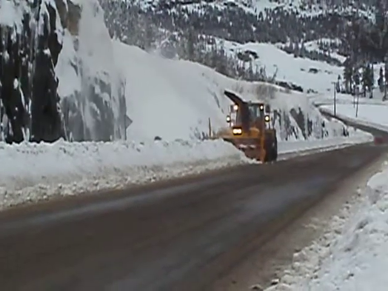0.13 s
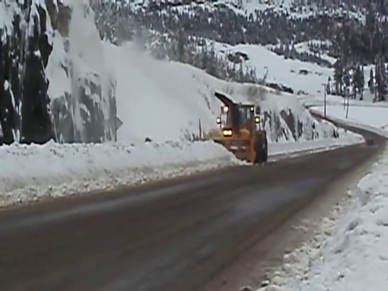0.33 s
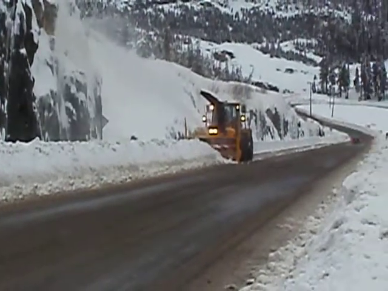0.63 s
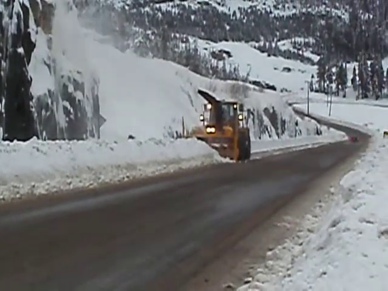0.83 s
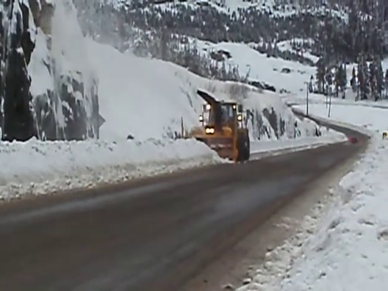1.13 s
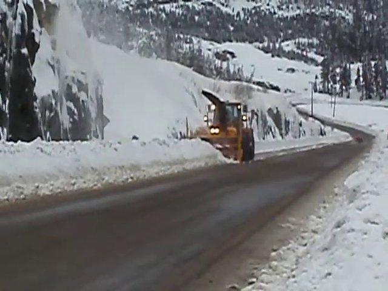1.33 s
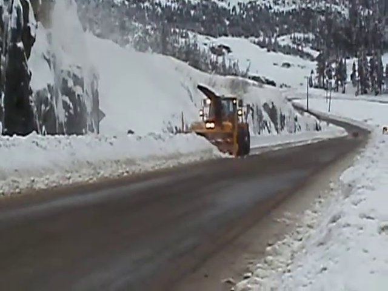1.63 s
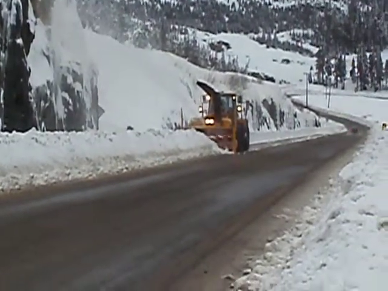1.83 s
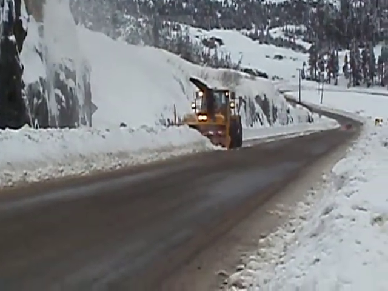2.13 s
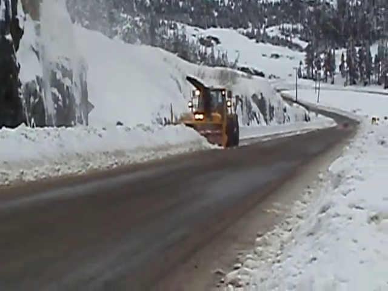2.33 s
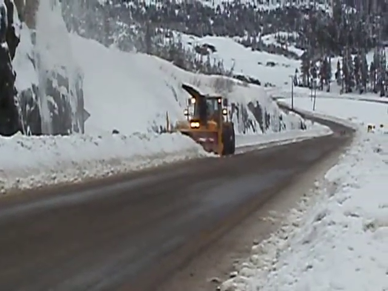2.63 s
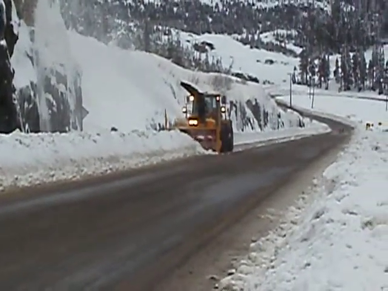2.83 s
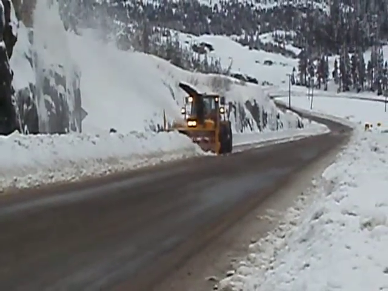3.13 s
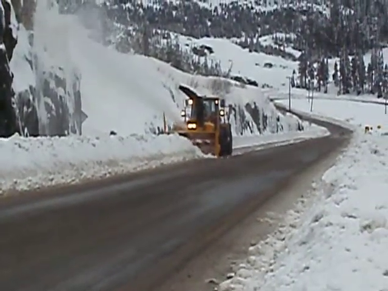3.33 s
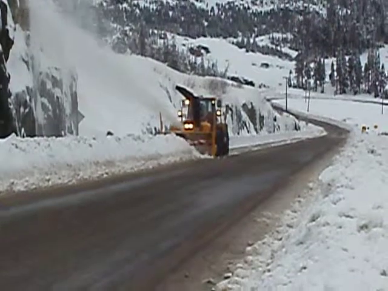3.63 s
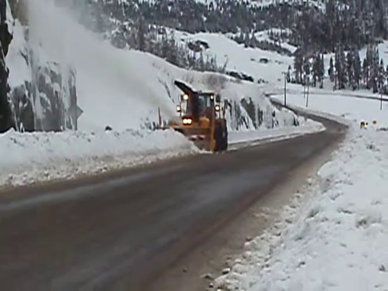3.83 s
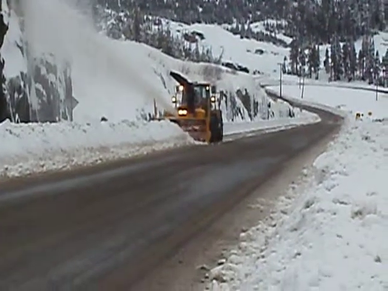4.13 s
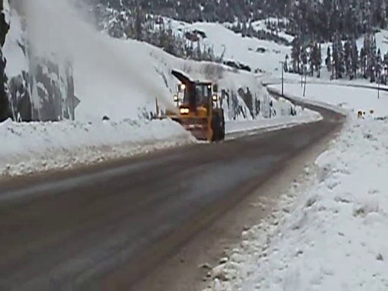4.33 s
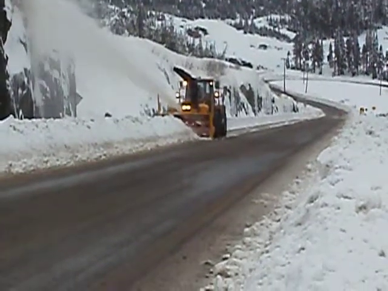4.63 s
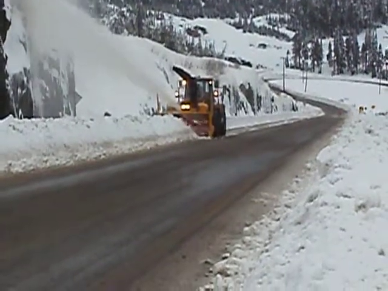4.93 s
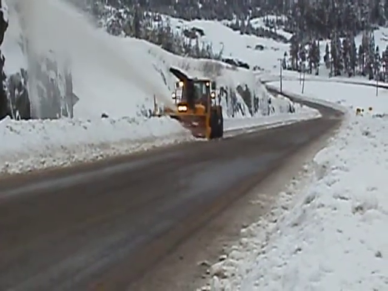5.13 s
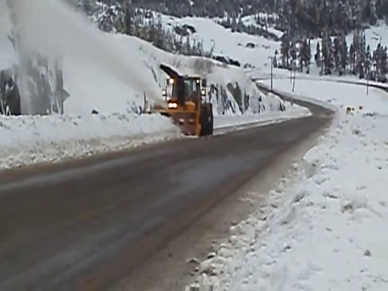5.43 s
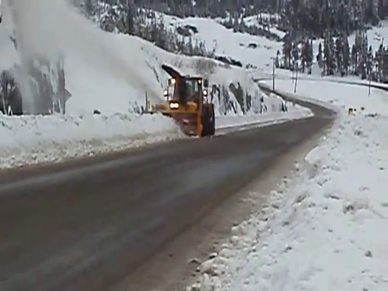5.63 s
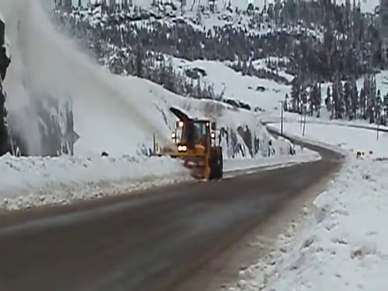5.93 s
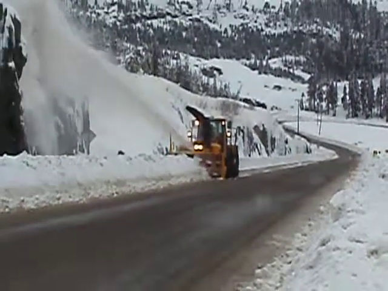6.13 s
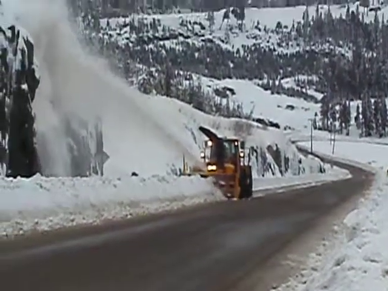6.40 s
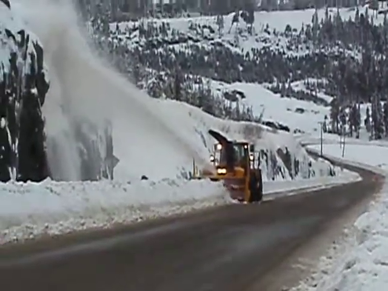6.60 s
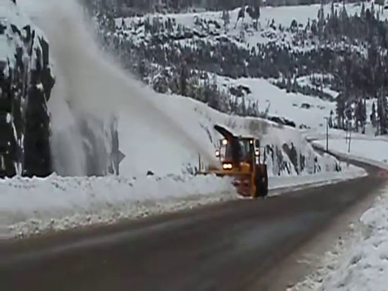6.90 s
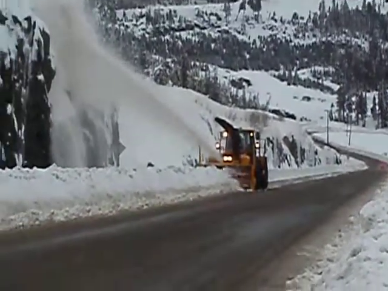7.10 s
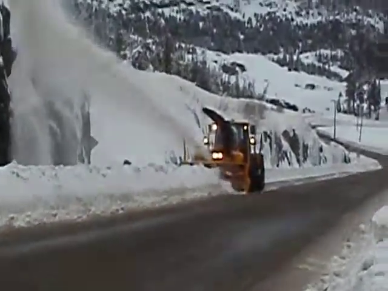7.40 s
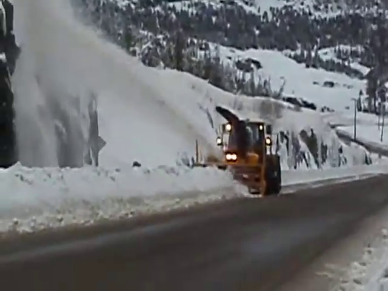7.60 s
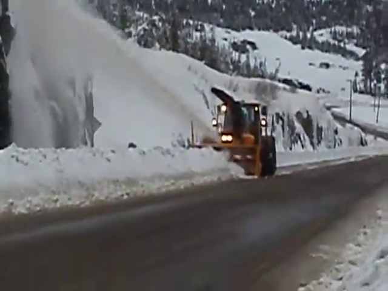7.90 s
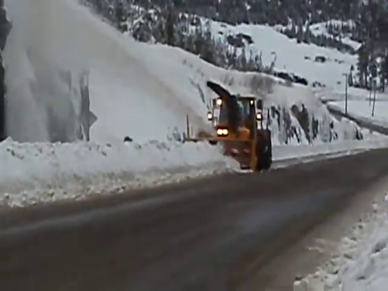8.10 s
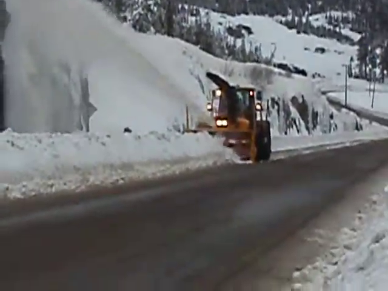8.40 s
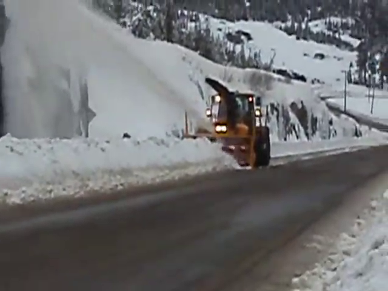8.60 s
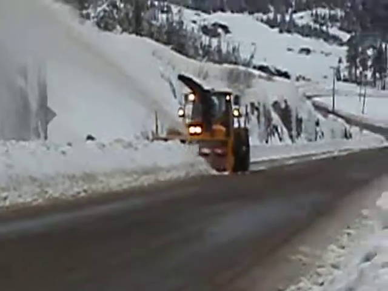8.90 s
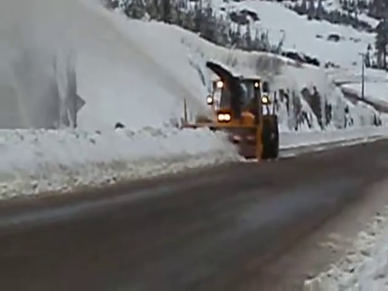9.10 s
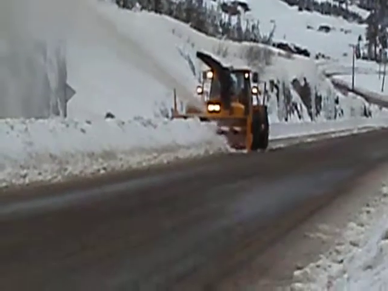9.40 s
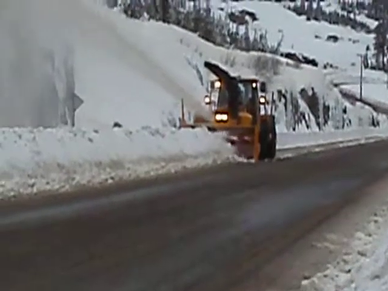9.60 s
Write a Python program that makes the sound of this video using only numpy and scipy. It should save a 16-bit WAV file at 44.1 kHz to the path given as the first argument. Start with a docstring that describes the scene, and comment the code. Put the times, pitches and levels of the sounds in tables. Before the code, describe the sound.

Outdoors by a roadside rock face, a loader's diesel drones steadily with a fluttering gear whine. A few small ticks hit the microphone at the start. After about three and a half seconds the engine sags and growls under load, the snow impeller roars, ice knocks dully in the chute, and everything slowly gets louder. Late, hard clicks crack against the narrow, boxy camera microphone.

```python
"""Wheel loader blowing snow

A wheel loader with a snow blower creeps nearer along a rock cut. Its six-cylinder diesel is heard as tones
locked to its engine cycle; it runs light, then sags and growls as the auger bites into the bank.
Gears whine as fluttering tones, and the impeller roars as pulsing, filtered noise. Ice knocks in the chute as
short noise bursts. Flecks ring a small camera right at its microphone, the hardest ones overloading it."""
import sys
import numpy as np
from scipy import signal
from scipy.fft import rfft, irfft, next_fast_len
from scipy.io import wavfile
from scipy.ndimage import uniform_filter1d, minimum_filter1d

SR = 44100
rng = np.random.default_rng(int(sys.argv[2]) if len(sys.argv) > 2 else 0)


def transcribe(signal):
    """Save signal, clipped to [-1, 1], as a 16-bit WAV file at the path in sys.argv[1]."""
    frames = np.atleast_2d(signal).T
    limited = np.clip(frames, -1, 1)
    pcm = np.round(limited * 32767).astype(np.int16)
    wavfile.write(sys.argv[1], SR, pcm)


N = 429975
TIME = np.arange(N) / SR  # seconds
CYLINDERS = 6  # each fires once per engine cycle

# Bright clatter of the engine block and the machine's panels: (frequency [Hz], relative level per Hz [dB])
CLATTER_SPECTRUM = [(1500, -29), (1930, -12.5), (2060, 2.5), (2350, 1), (2690, -7.5), (2830, -1.5),
                    (3100, -4), (3380, -7.5), (3620, -1), (3850, -8.5), (4020, -15), (4500, -26)]
# The chute's dull knock: (frequency [Hz], relative level per Hz [dB])
CHUTE_SPECTRUM = [(400, -23.5), (560, -1), (800, 3.5), (1000, -3), (1250, -25.5)]


def gain_of(db):
    """Turns decibels into an amplitude factor."""
    return 10 ** (np.asarray(db) / 20)


def evened(x):
    """Scales a sound to an average (rms) strength of 1."""
    return x / np.sqrt(np.mean(x ** 2) + 1e-20)


def follow(rows):
    """Draws straight lines between the rows of (time [s], ...): one curve over the scene per column."""
    times, *columns = np.transpose(rows)
    return [np.interp(TIME, times, column) for column in columns]


def drift(rate_hz):
    """Makes a slow random curve of rms 1, with wiggles up to about rate_hz."""
    points, points_per_s = 4096, 400
    hz = np.fft.rfftfreq(points, 1 / points_per_s)
    slow = irfft(rfft(rng.standard_normal(points)) / (1 + (hz / rate_hz) ** 2))
    return evened(np.interp(TIME, np.arange(points) / points_per_s, slow))


def coloured(x, spectrum):
    """Filters x by a spectrum of (frequency [Hz], level [dB]) points and scales it to rms 1."""
    hz, db = np.transpose(spectrum)
    length = next_fast_len(N)
    log_hz = np.log(np.fft.rfftfreq(length, 1 / SR) + 1)  # +1 avoids the log of zero
    shape = gain_of(np.interp(log_hz, np.log(hz), db, left=-80, right=-80))
    return evened(irfft(rfft(x, length) * shape, length)[:N])


def tone(turns, flutter, rate_hz):
    """A tone of about rms 1; shifting paths along the rock make part of it flutter in level and phase."""
    angle = 2 * np.pi * (turns + rng.random())
    steady = np.sqrt(2 * (1 - flutter ** 2))
    in_step = (steady + flutter * drift(rate_hz)) * np.cos(angle)
    quarter_turn_off = flutter * drift(rate_hz) * np.sin(angle)
    return in_step + quarter_turn_off


def burst(spectrum, t60):
    """A puff of noise fading 60 dB in t60 seconds, filtered by (frequency [Hz], level [dB]), peak 1."""
    t = np.arange(4096) / SR
    hz, db = np.transpose(spectrum)
    shape = gain_of(np.interp(np.fft.rfftfreq(len(t), 1 / SR), hz, db, left=-50, right=-50))
    # The shape is squared because the minimum-phase step, which makes it start at once, takes a root
    impulse = np.fft.fftshift(irfft(shape ** 2))[1793:2304] * np.hanning(511)
    taps = signal.minimum_phase(impulse, n_fft=8192)
    fading_noise = rng.standard_normal(len(t)) * gain_of(-60 * t / t60)
    puff = signal.lfilter(taps, 1, fading_noise)
    return puff / abs(puff).max()


def ring(modes, weights=1):
    """A struck body sounds several fading tones, neighbours in opposite phase, together peak 1."""
    t = np.arange(4096) / SR
    hz, db, t60 = np.transpose(modes)[:, :, None]
    signs = (-1) ** np.arange(len(modes))
    weights = np.reshape(weights * signs, (-1, 1))
    fading = gain_of(db - 60 * t / t60)
    sound = (weights * fading * np.sin(2 * np.pi * hz * t)).sum(0)
    return sound / abs(sound).max()


def add(mix, start_s, sound):
    """Mixes a sound in at a start time, cut off at the scene's end."""
    part = mix[round(start_s * SR):][:len(sound)]
    part += sound[:len(part)]


def exhaust(cycles, load, near_db):
    """Regular firing makes a strong note, and other multiples of the engine cycle swell or fade with load."""
    # Firing note: (time [s], level [dB])
    note_level = [(0.0, -33.5), (2.6, -34), (3.9, -30), (5.6, -30), (6.5, -31), (7.5, -28), (8.5, -25.5),
                  (9.2, -27.5), (9.75, -28)]
    # Engine tones: (multiple of the engine cycle, level running light [dB], level under load [dB]),
    # both levels before the gain from coming nearer
    engine_orders = [(8, -55, -43), (9, -52, -41.5), (10, -45.5, -52), (12, -51.5, -39.5),
                     (14, -55.5, -43.5), (18, -49, -42), (20, -63.5, -49.5), (24, -58.5, -52),
                     (26, -49, -44), (28, -38, -47.5), (30, -51, -36), (32, -42.5, -41), (34, -48, -45),
                     (36, -54.5, -47.5), (38, -47, -43.5)]
    note_db, = follow(note_level)
    note_gain = gain_of(note_db + 0.29 * drift(rate_hz=2.7))
    sound = note_gain * tone(CYLINDERS * cycles, flutter=0.051, rate_hz=24)
    for multiple, light_db, loaded_db in engine_orders:
        level_db = light_db + (loaded_db - light_db) * load + near_db
        sound += gain_of(level_db) * tone(round(multiple) * cycles, flutter=0.36, rate_hz=4)
    return sound


def puffs(cycles, depth, uneven_db):
    """Noise that surges at each firing and dies down until the next; firings differ in strength."""
    firings = CYLINDERS * cycles
    strength = gain_of(uneven_db * rng.standard_normal(2048))[firings.astype(int)]
    surge = evened(np.exp(-(firings % 1) / 0.4))
    return (1 - depth + depth * surge * strength) * rng.standard_normal(N)


def lumps(per_s, spread_db):
    """Lumps of snow hit steel as single clicks at random times: many small, a few large."""
    size = gain_of(spread_db * np.minimum(rng.exponential(1, N), 4))
    hits = rng.random(N) < per_s / SR
    return evened(size * rng.choice([-1, 1], N) * hits)


def effort(load, sag_hz, light_db, load_db, db_per_hz):
    """Gain of a noise that changes with load and grows as the engine slows."""
    return gain_of(light_db + load_db * load + db_per_hz * sag_hz)


def machine_noise(cycles, load, sag_hz):
    """Exhaust puffs rumble, air and snow rush through the housing, and combustion knocks in the block."""
    # Spectra of the rumble and of the housing's roar, light and loaded:
    # (frequency [Hz], relative level per Hz [dB])
    rumble_spectrum = [(20, -33), (33, -17), (45, -5), (60, -12), (85, 0), (125, -2.5), (180, 0), (290, 2),
                       (340, -1.5), (400, -6.5), (520, -27.5), (900, -51)]
    light_spectrum = [(330, -33.5), (420, -14), (490, -3), (640, -6.5), (750, -1.5), (930, -3.5),
                      (1080, -11), (1400, -15), (1750, -13.5), (1930, -26), (2600, -28)]
    loaded_spectrum = [(330, -28.5), (420, -15), (490, -4.5), (660, 0), (860, 0), (1000, -6.5), (1150, -7),
                       (1400, -11.5), (1750, -16.5), (1930, -14.5), (2600, -35)]

    rumble = coloured(puffs(cycles, depth=0.22, uneven_db=2.5), rumble_spectrum)
    rumble *= gain_of(0.5 * drift(rate_hz=2.3))

    rush = evened(puffs(cycles, depth=0.21, uneven_db=2.5)) + 0.47 * lumps(per_s=250, spread_db=2.0)
    rush *= gain_of(0.6 * drift(rate_hz=8))  # snow feeds in unevenly
    light_share, loaded_share = np.sqrt(1 - load), np.sqrt(load)
    roar = light_share * coloured(rush, light_spectrum) + loaded_share * coloured(rush, loaded_spectrum)
    roar /= light_share + loaded_share

    knock = evened(puffs(cycles, depth=0.19, uneven_db=2.5)) + 0.45 * lumps(per_s=350, spread_db=2.6)
    clatter = coloured(knock, CLATTER_SPECTRUM)

    rumble *= effort(load, sag_hz, light_db=-37, load_db=1.6, db_per_hz=0.092)
    roar *= effort(load, sag_hz, light_db=-29.5, load_db=-0.62, db_per_hz=0.48)
    clatter *= effort(load, sag_hz, light_db=-38, load_db=3.68, db_per_hz=0.3)
    return rumble + roar + clatter


def gears(cycles, load, near_db, sag_hz):
    """Passing impeller blades and meshing gear teeth make tones that follow the engine speed."""
    # Timing gears, singing most clearly while the engine runs light: (time [s], level [dB])
    timing_level = [(0, -35.5), (1, -34), (1.8, -35), (2.8, -43), (4, -49.5), (9.75, -40.5)]
    # Impeller blades and gear meshes: (multiple of the engine cycle)
    mesh_ratios = [2.33, 11.3, 41.3, 55.2, 59.85, 77.5, 118.6, 144.5]
    # One row for each of them: (level running light [dB], level under load [dB], flutter [0-1]),
    # both levels before the gains from coming nearer and from engine sag
    mesh_levels = [(-47.5, -49.5, 0.4), (-49, -48, .3), (-40, -44, .8), (-43, -45, 0.8), (-55, -40.5, 0.4),
                   (-62, -39.5, .6), (-52.5, -42, .8), (-61.5, -46, .9)]
    timing_teeth = 48
    timing_db, = follow(timing_level)
    timing = gain_of(timing_db) * tone(timing_teeth * cycles, flutter=0.54, rate_hz=2.1)
    meshes = np.zeros(N)
    for ratio, (light_db, loaded_db, flutter) in zip(mesh_ratios, mesh_levels):
        level_db = light_db + (loaded_db - light_db) * load
        meshes += gain_of(level_db) * tone(ratio * cycles, flutter, rate_hz=5.5)
    # The meshes sing less as the engine sags: -0.43 dB per Hz of firing rate
    return timing + gain_of(near_db - 0.43 * sag_hz) * meshes


def flecks(focus_octaves, splat_db):
    """A fleck rings the camera's shell around one pitch, set by where it lands; wet ones thud and splat too."""
    # Flecks: (time [s], level [dB], strongest ring [Hz], thud and splat relative to the ring [dB])
    strikes = [(0.092, -15, 2060, -4), (0.2999, -9.5, 2080, -3.5), (0.4082, -11, 2070, -8),
               (0.4285, -12, 2100, -18), (.4520, -14.5, 2050, -6.5), (7.16, 6.5, 2600, -6.5),
               (7.4247, 4.5, 3098, 2.5), (8.704, 1, 2742, -10), (8.851, 6.5, 2700, -1)]
    # The shell's tones: (frequency [Hz], relative level [dB], time to fade 60 dB [s])
    shell_modes = [(1830, -5.5, 0.012), (2310, -2, 0.006), (2626, -9.5, 0.015), (2884, -3.5, 0.0086),
                   (3530, -3.5, 0.018), (3885, -0.5, 0.015)]
    # The heavier frame, shaken by wet flecks: (frequency [Hz], relative level [dB], time to fade 60 dB [s])
    frame_modes = [(56.8, -8, 0.025), (332, -2.5, 0.018), (559, -2, 0.02), (819, -0.5, 0.022),
                   (1423, 1, 0.013)]
    # Wet splat: (frequency [Hz], relative level per Hz [dB])
    splat_spectrum = [(500, 4.5), (1200, -4.5), (2400, -2.5), (3800, -1), (4300, -27.5)]
    out = np.zeros(N)
    mode_hz = np.transpose(shell_modes)[0]
    for start_s, level_db, ring_hz, wet_db in strikes:
        octaves_away = np.log2(mode_hz / ring_hz)
        focus = 1 / (1 + (octaves_away / focus_octaves) ** 2)
        wet = ring(frame_modes) + gain_of(splat_db) * burst(splat_spectrum, t60=0.022)
        add(out, start_s, gain_of(level_db) * (ring(shell_modes, focus) + gain_of(wet_db) * wet))
    return out


def ice():
    """Each large chunk gives the chute a dull knock and the machine's panels a bright tick."""
    # Largest chunks of ice: (time [s], knock level [dB], bright tick level [dB])
    chunks = [(5.216, -14, -33), (5.331, -12.5, -32), (5.518, -9, -35), (5.975, -13.5, -26),
              (6.010, -13, -33), (6.038, -10, -33), (6.262, -12.5, -22), (6.311, -14.5, -24),
              (7.103, -16, -14.5), (8.488, -19, -18.5)]
    out = np.zeros(N)
    for start_s, knock_db, tick_db in chunks:
        knock = gain_of(knock_db) * burst(CHUTE_SPECTRUM, t60=0.023)
        tick = gain_of(tick_db) * burst(CLATTER_SPECTRUM, t60=0.022)
        add(out, start_s, knock + tick)
    return out


def chips(load):
    """Small chunks knock and tick at random times, more often as the auger bites deeper."""
    per_s_full_load, spread_db = 8, 0.5
    hits = rng.random(N) < per_s_full_load * load / SR
    strikes = hits * gain_of(spread_db * rng.standard_normal(N))
    knock = gain_of(-20) * burst(CHUTE_SPECTRUM, t60=0.031)
    tick = gain_of(-26.5) * burst(CLATTER_SPECTRUM, t60=0.022)
    return signal.oaconvolve(strikes, knock + tick)[:N]


def squeak():
    """Steel rubs for an instant: a rising tone that swells and fades in one arch."""
    start_s, length_s, level_db = 3.515, 0.058, -30
    start_hz, rise_hz_per_s = 1560, 1700
    t = np.clip(TIME - start_s, 0, length_s)
    turns = np.cumsum(start_hz + rise_hz_per_s * t) / SR
    arch = np.sin(np.pi * t / length_s)
    return gain_of(level_db) * arch * tone(turns, flutter=0.79, rate_hz=54)


def low_pass(x, hz):
    """Steeply removes everything above hz."""
    taps = signal.firwin(401, hz, window=("kaiser", 8), fs=SR)
    return signal.oaconvolve(x, taps[None], "same")


def limited(x, ceiling, share):
    """A fast limiter takes away a share of any excess over the ceiling, counted in dB."""
    highest_nearby = -minimum_filter1d(-abs(x), size=25)
    peak = uniform_filter1d(highest_nearby, size=25)
    return x / np.maximum(peak / ceiling, 1) ** share


def scene():
    """One engine speed drives the tones and pulsing noise, most of which grow louder as the machine nears."""
    # The diesel sags in heavy snow and partly recovers: (time [s], firing rate [Hz])
    speed = [(0.0, 110.2), (1.1, 110.7), (2.4, 110.5), (3.55, 109.1), (4.1, 104.3), (4.6, 104.5),
             (5.2, 105.9), (5.55, 107.4), (5.95, 104.4), (6.5, 103.4), (7.0, 104.7), (7.7, 106.9),
             (8.45, 107.4), (8.6, 106.5), (8.82, 107.3), (9.1, 105.4), (9.75, 105.2)]
    # How deep the auger is in the bank: (time [s], load [0-1])
    auger_load = [(0, 0.52), (1.2, 0), (3.0, 0.1), (3.6, .7), (4.3, 0.85), (9.75, 1)]
    free_hz = 110.6  # firing rate with no snow to throw
    start_m, creep_m_per_s = 48, 1.68
    firing_hz, = follow(speed)
    load, = follow(auger_load)
    cycles = np.cumsum(firing_hz) / SR / CYLINDERS
    sag_hz = free_hz - firing_hz
    near_db = -20 * np.log10(1 - creep_m_per_s * TIME / start_m)  # halving the distance adds 6 dB

    tones = exhaust(cycles, load, near_db) + gears(cycles, load, near_db, sag_hz)
    noise = gain_of(near_db) * machine_noise(cycles, load, sag_hz)
    knocks = ice() + chips(load) + squeak()
    return (tones + noise + knocks + flecks(focus_octaves=0.19, splat_db=-2.5))[None]


def record(dry):
    """A narrow-band microphone with a fast limiter; peaks that get past it flatten and fizz above the band."""
    band_hz, edge_hz, flat_level = 4420, 16400, 0.72
    narrow = limited(low_pass(dry, band_hz), ceiling=0.63, share=0.73)
    clipped = narrow / (1 + (narrow / flat_level) ** 24) ** (1 / 24)
    return low_pass(clipped, edge_hz)


dry = scene()
out = record(dry)
transcribe(out)
```